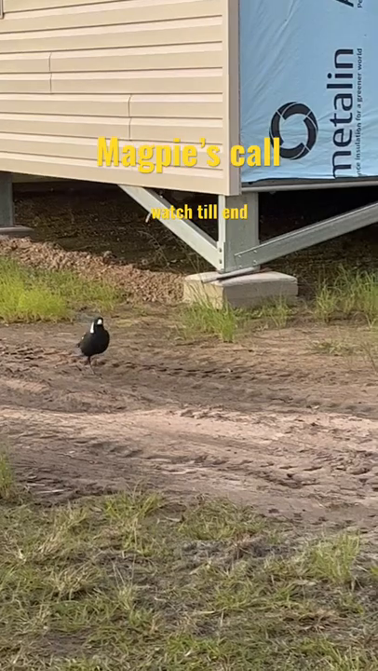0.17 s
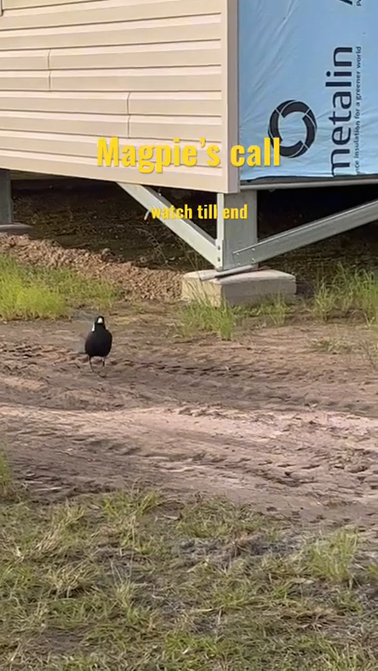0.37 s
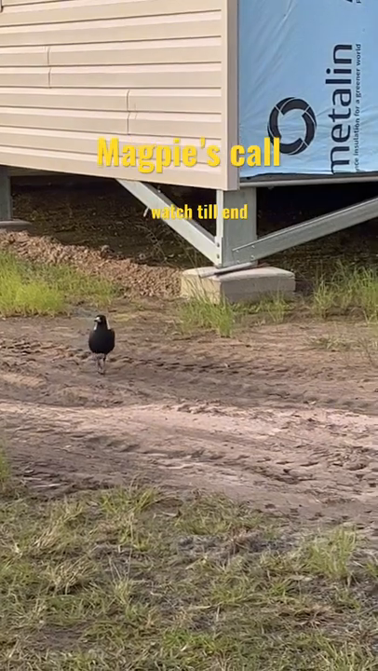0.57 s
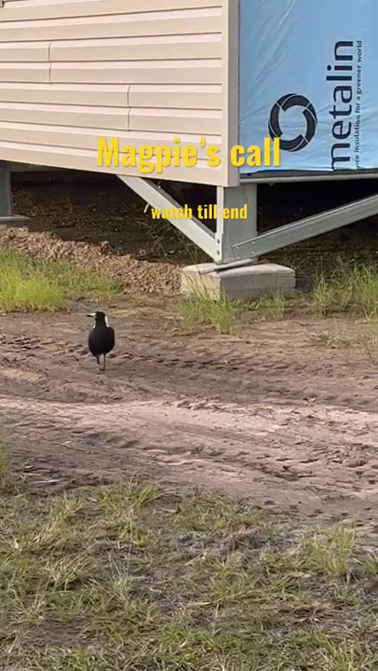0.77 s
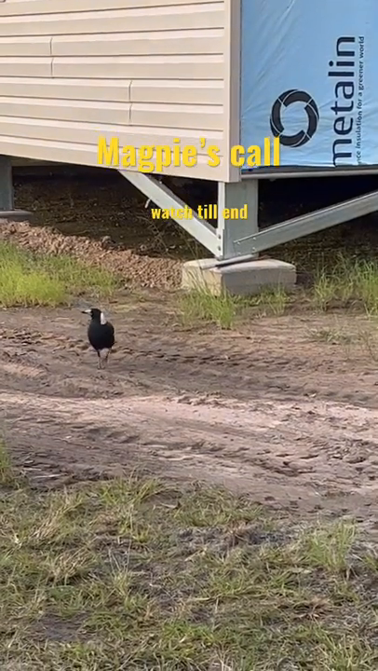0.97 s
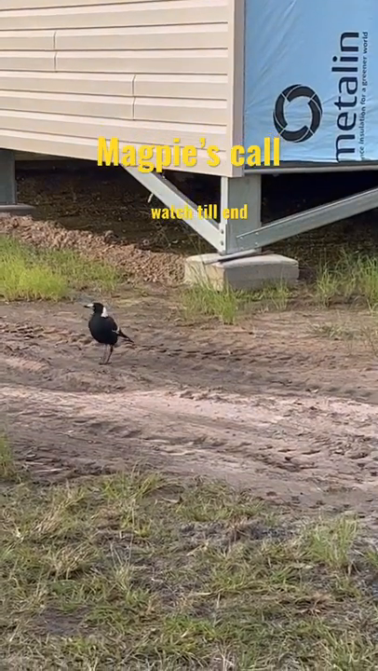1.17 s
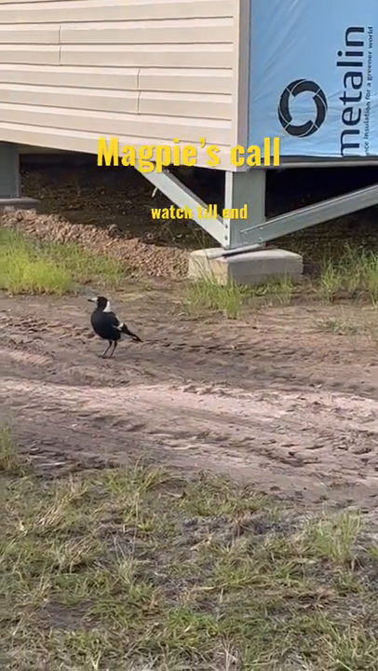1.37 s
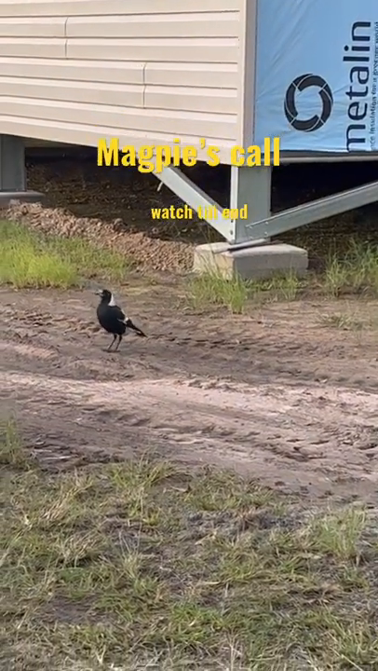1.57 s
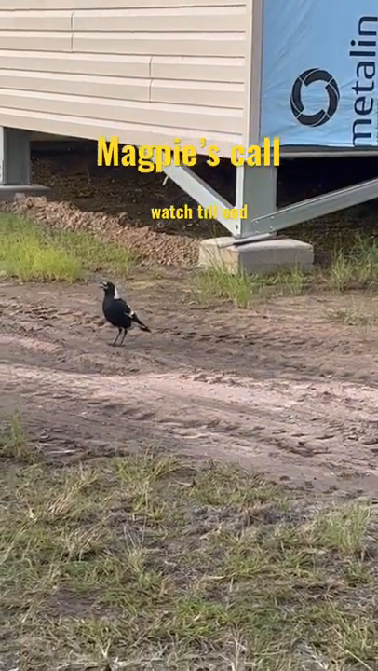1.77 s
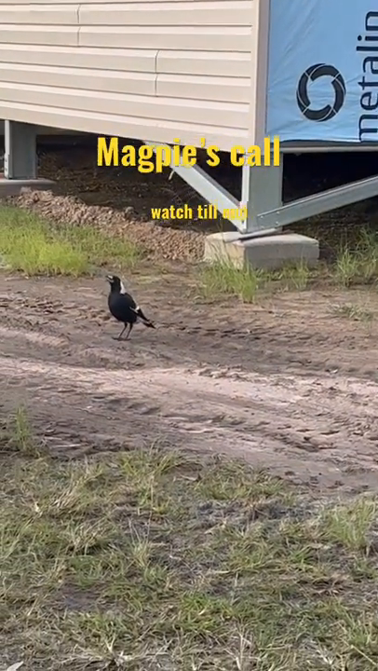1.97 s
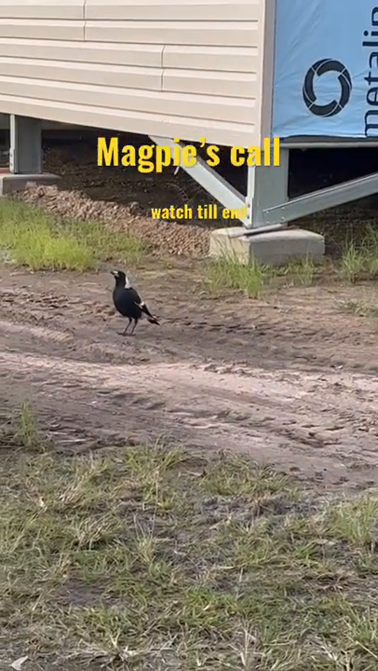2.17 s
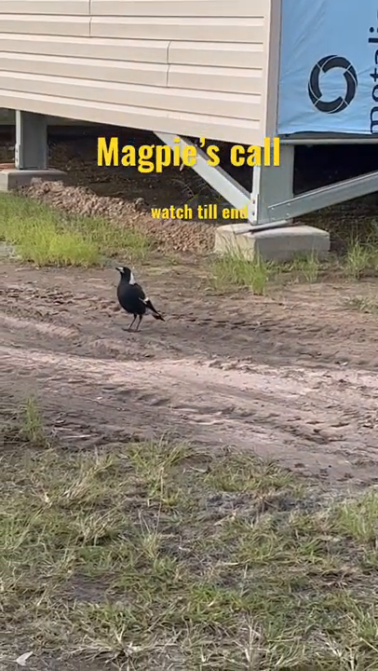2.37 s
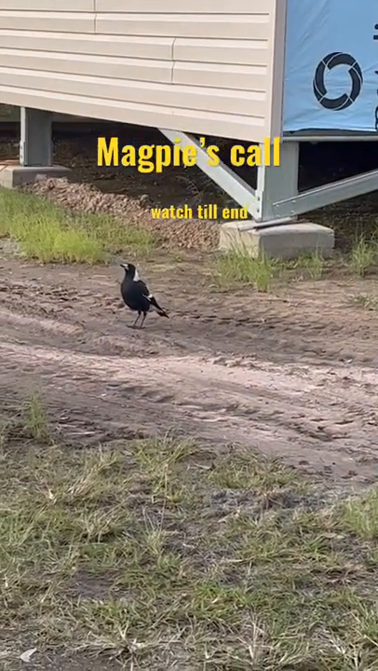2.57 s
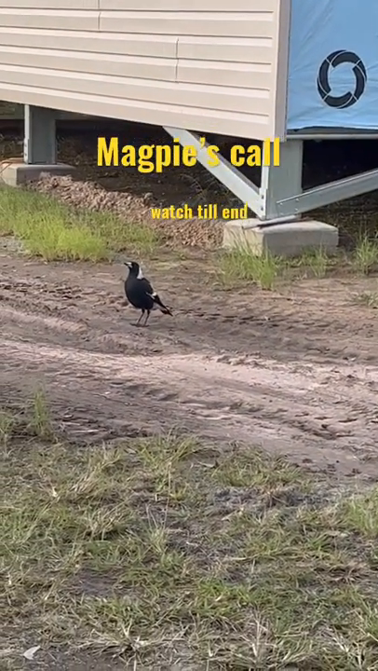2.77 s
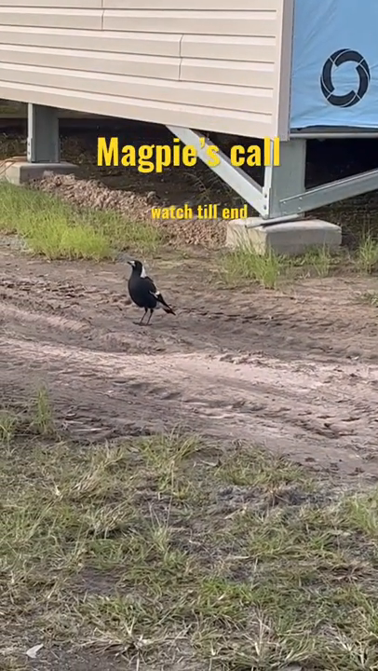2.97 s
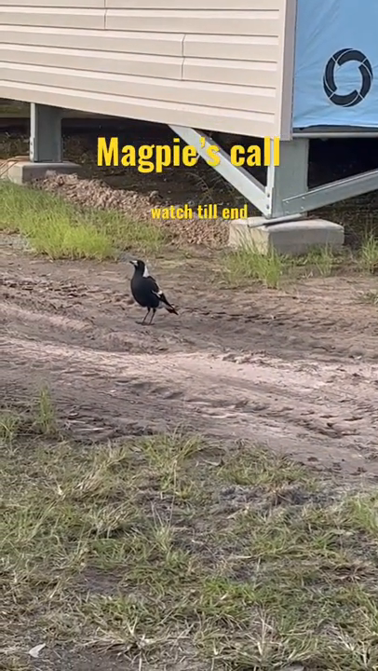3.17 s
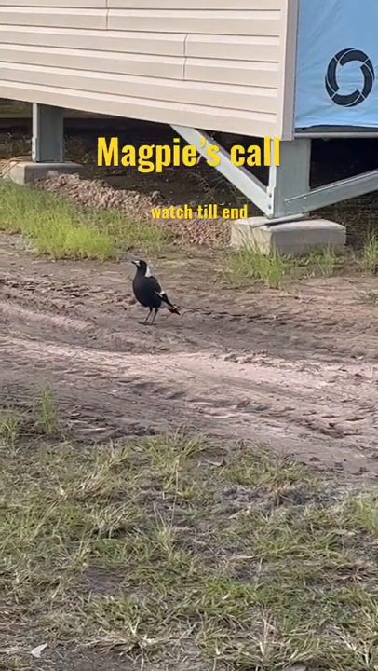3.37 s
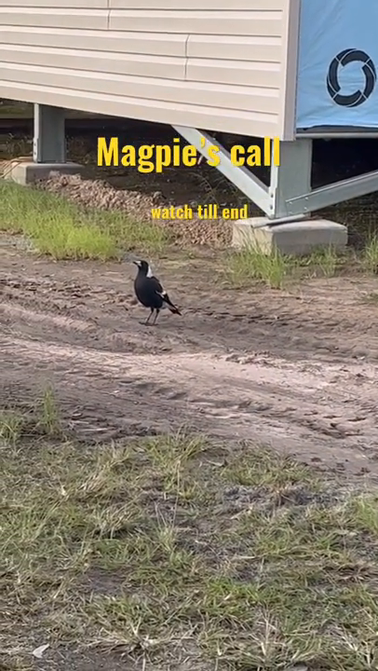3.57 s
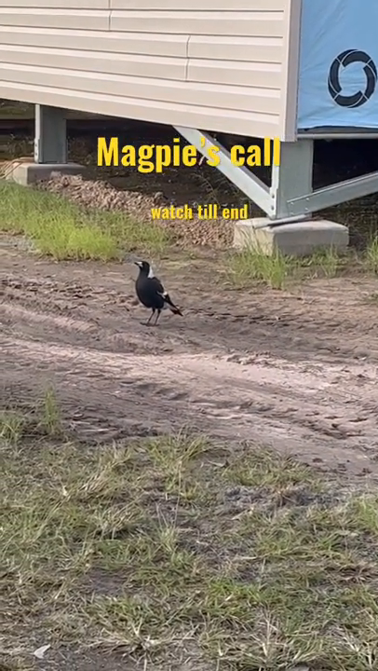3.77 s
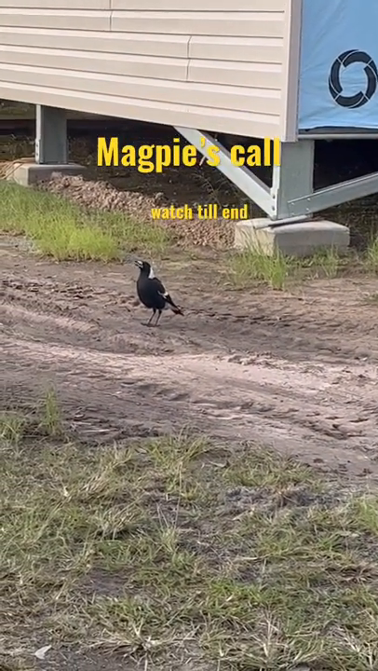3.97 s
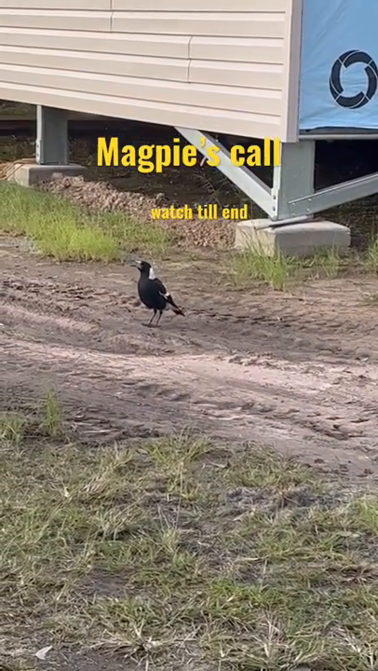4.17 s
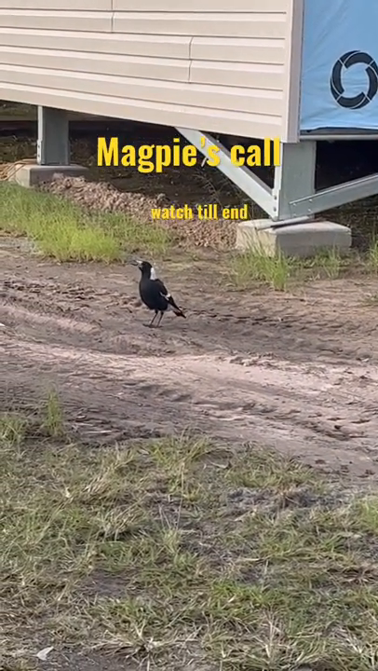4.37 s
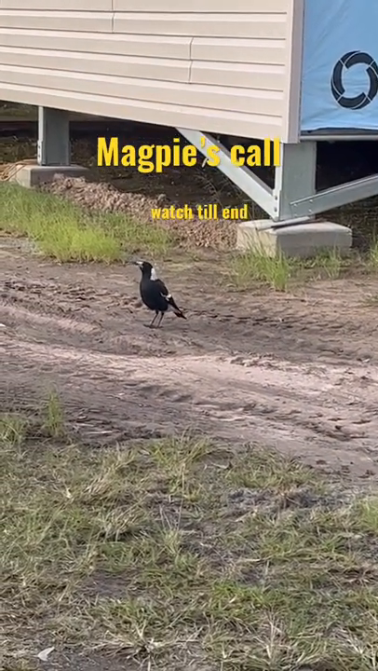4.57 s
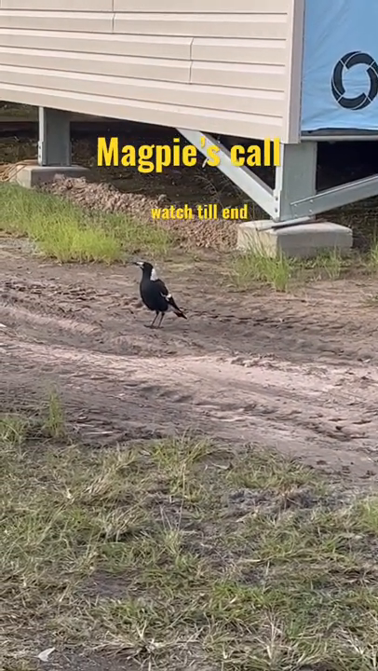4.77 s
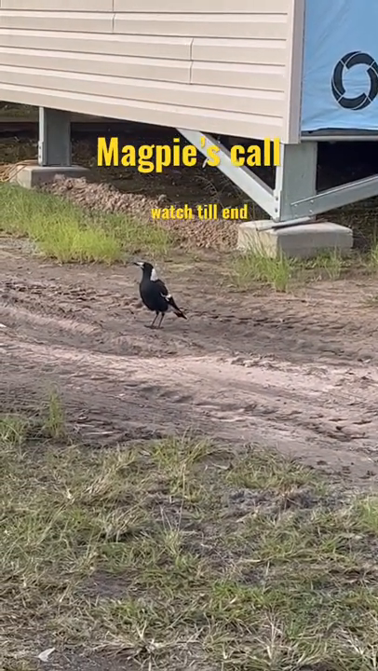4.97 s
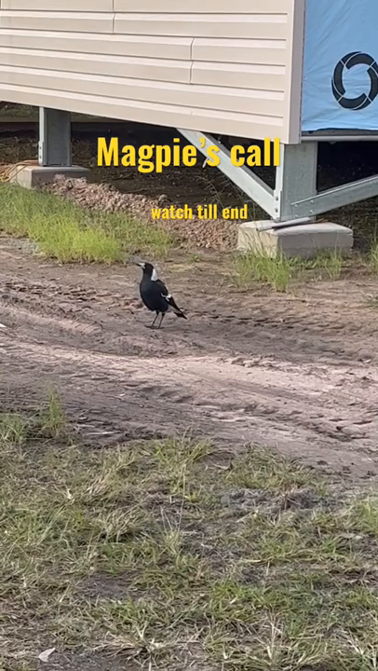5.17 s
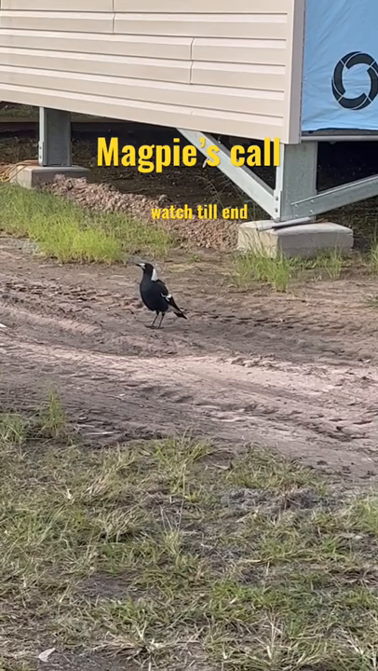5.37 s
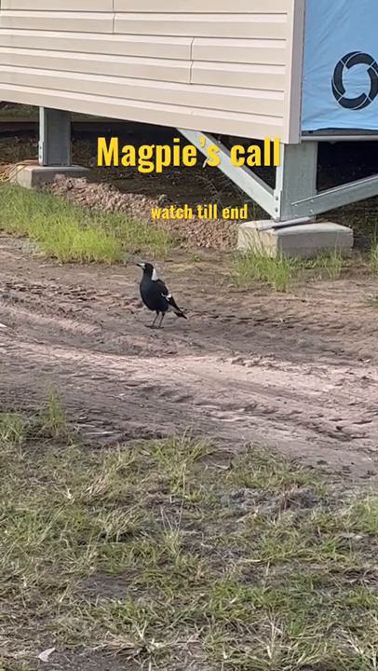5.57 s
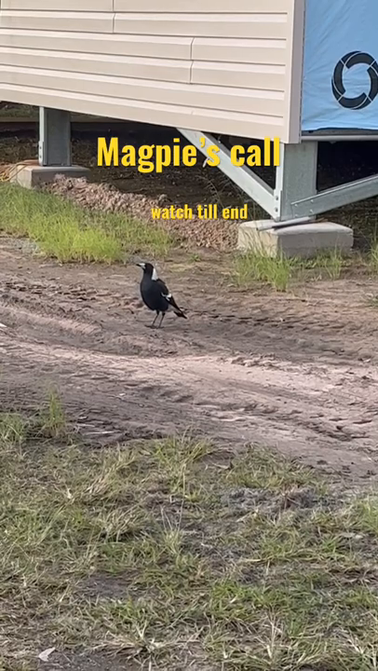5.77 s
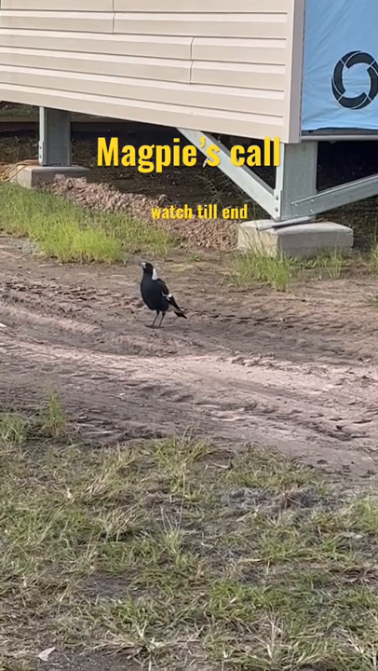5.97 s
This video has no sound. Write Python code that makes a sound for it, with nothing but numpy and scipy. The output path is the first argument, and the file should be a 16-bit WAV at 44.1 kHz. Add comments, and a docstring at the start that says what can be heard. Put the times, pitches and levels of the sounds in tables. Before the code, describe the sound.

Outdoors, a nearby magpie calls twice, each a harsh rasp snapping to a clear whistle and a rattling buzz, above swelling distant traffic.

```python
"""Magpie calling in a yard

A magpie on bare ground beside a cabin gives two falling calls, a few metres away. Each starts as a rasp, snaps
into a clear whistle and breaks into a buzz: sine partials of a moving pitch, roughened by the two sides of the
syrinx, with coloured noise for torn air. Delays and noise tails echo the calls and the faint ticks of grit close by.
Wavering sines make a far engine and drone, filtered noise the traffic and hiss, thin sliding sines a far bird."""
import sys
import numpy as np
from scipy import signal
from scipy.fft import rfft, irfft, next_fast_len
from scipy.io import wavfile
from scipy.ndimage import map_coordinates

SR = 44100
rng = np.random.default_rng(int(sys.argv[2]) if len(sys.argv) > 2 else 0)


def wav_out(sig):
    """Save sig, one row per channel (or a flat mono array), as 16-bit PCM at SR to the path in sys.argv[1]."""
    wavfile.write(sys.argv[1], SR, np.round(np.clip(np.atleast_2d(sig).T, -1, 1) * 32767).astype(np.int16))


N = 266011
T = np.arange(N) / SR
SIZE = next_fast_len(N + SR // 10, True)  # padded, so filters do not wrap round
FREQS = np.fft.rfftfreq(SIZE, 1 / SR)

# Traffic that draws nearer, then holds; the layers add their own trims. Each row: time in seconds,
# then the levels of deepest rumble, exhaust rumble, tyre roar and high hiss, all in dB.
TRAFFIC_LEVELS = [(0, -50.5, -50, -59, -108), (1.5, -50, -42.5, -54.5, -71.5), (2.3, -48, -40.5, -51, -68),
                  (3, -44.5, -38, -48.5, -63), (4.1, -40, -36.5, -51, -65.5),
                  (6.03, -42, -40.5, -52, -66.5)]


def magpie(call):
    """One call: the two sides of the syrinx grind, lock into a whistle, then lose and regain lock in a rattle."""
    # Overtones; the windpipe favours the odd ones. Each row: multiple of the pitch, level in dB.
    odd_series = [(3, 0), (5, -9.5), (7, -24), (9, -42)]
    even_series = [(2, 0), (4, -17)]
    # Weak top overtones that swell with the odd ones. Each row: multiple of the pitch, level in dB.
    edge_series = [(4, -32), (6, -26), (8, -26)]
    # Air rushing through the resonances of windpipe and beak. Each row: frequency in Hz, gain in dB.
    rasp_air = [(1200, -15), (2000, 4.5), (2800, -13), (3700, 4), (4600, 5), (5500, 13), (6200, 1),
                (6900, -23.5), (7600, -1.5), (8700, 7), (9800, -2.5), (10600, -15.5), (12000, -7),
                (14000, -4.5), (15000, -35)]
    # Windpipe and beak darken the valleys between resonances. Each row: frequency in Hz, gain in dB.
    beak = [(2200, 0), (2700, -5), (3300, 0.5), (6300, -2.5), (7200, -12), (7800, 1)]
    grind_hz, rattle_rise_hz_per_s = 431.6, 70  # pitch difference of the two sides in the rasp, in Hz; rise of their beat in the buzz, in Hz per second
    grind_depth, gap_depth = .51, .7
    grind_swing, rasp_jitter, buzz_jitter = .42, .55, .25  # phase, radians
    waver_db, overtone_waver_db, waver_hz = 1.8, 1.1, 40
    upper_db, lower_db, above_db = -8, -9, -12  # second side in the rasp, beat lines below and above in the buzz
    fundamental_sag_hz, octave_lag_hz = 44.5, 69.5  # below and above the falling buzz, 0.3 s into it
    air_db = -1

    start, clears, breaks, ends = call[:4]
    rattle_hz = call[-1]
    hz, levels = gesture(*call[:-1])
    sounding = step(start + .018, .014) * (1 - step(ends, .0093))  # dies away rather than stops
    base, even, odd = undb(levels) * sounding
    hoarse = 1 - step(clears, .008)
    buzz = step(breaks, .0014)
    fading = np.clip(T - breaks, 0, .3)
    spent = fading / (ends - breaks)

    grind = turn(grind_hz * (1 + .16 * walk(150)))
    beat_hz = rattle_hz + rattle_rise_hz_per_s * fading
    beat = turn(buzz * beat_hz * (1 + .03 * walk(70)))
    # the rattle follows the beat of the two sides, but stumbles more and more as the pressure falls
    rattle = beat + (.25 + 1.3 * spent) * walk(110)
    gap = buzz * (.5 + .5 * np.tanh(2.5 * (-np.cos(rattle) - .25 + .35 * walk(120))))
    loose = np.maximum(hoarse, gap)

    unrest = grind_swing * loose * np.sin(grind)
    unrest += (rasp_jitter * hoarse + buzz_jitter * gap) * walk(380)
    unrest += (.015 + .08 * buzz) * walk(90)
    # every pulse of the rattle pulls the pitch along and lets it slip back
    unrest += .75 * buzz * (1 - .5 * spent) * (np.sin(rattle) - .4 * np.sin(2 * rattle))
    throb = (1 - gap_depth * gap) * (1 + grind_depth * loose * np.cos(grind))

    phase = turn(hz)
    drift = (fading / .3) ** 2
    low = phase - turn(fundamental_sag_hz * drift)
    # the second side sings above the first in the rasp; in the buzz their beat puts a line on either side
    flanks = undb(lower_db) * np.sin(low - beat) + undb(above_db) * np.sin(low + beat)
    flanks *= undb(29 * fading)
    twin = hoarse * undb(upper_db) * np.sin(phase + grind + 2 * unrest) + buzz * flanks
    first_side = np.sin(low + fade(.1, 1, hoarse) * unrest)
    fundamentals = base * undb(waver_db * walk(waver_hz)) * (first_side + twin)

    bright = odd * undb(overtone_waver_db * walk(waver_hz)) * throb
    bright *= overtones(phase + .6 * unrest, odd_series + edge_series)
    # the octave grinds in the rasp but stays a clear line through the buzz, where it falls a little less
    octave_phase = phase + fade(.15, .65, hoarse) * unrest + turn(octave_lag_hz * drift)
    octave = even * fade(1, throb, hoarse) * overtones(octave_phase, even_series)

    # air leaks in uneven spurts while the membranes are unsettled
    spurts = unit(undb(3.5 * walk(350)))
    leak = odd * undb(air_db) * hoarse * throb * noise(rasp_air)
    leak += sounding * buzz * torn_air(spent, gap, grind)
    return colour(np.sqrt(2) * (fundamentals + bright + octave) + spurts * leak, beak)


def gesture(start, clears, breaks, ends, whistle_hz, rasp_db, voice_db):
    """Pitch and partial levels of a call: a swelling rasp, a gliding whistle, a dying buzz."""
    # Base strength of each voice, before the call's own level and the swells.
    # Columns: fundamental, even overtones and odd overtones, all in dB.
    rasp_strength = (-46, -42.5, -44.5)
    whistle_strength = (-28.5, -38.5, -30)
    buzz_strength = (-33, -48.5, -29)
    # Loss of each part by the end of the buzz. Columns: fundamental, even and odd overtones, in dB.
    buzz_loss = (16.5, 10, 28)
    rasp_hz, rasp_sag_hz_per_s = 1935, 1800
    overshoot_hz, settle_s, glide_s = 133.6, .013, 1.515  # the times are time constants
    whistle_swell_db, overtone_swell_db, swell_s = 11, 5.5, .11
    octave_fade_db_per_s, octave_lead_s = 129, .022  # the octave fades, then returns just before the buzz
    buzz_hz, buzz_fall_hz, buzz_fade_power = 1691, 324.5, 1.19
    lock_s, bend_s = .007, .0052  # rasp slides into whistle; pitch bends as the second side joins

    rasping = np.clip(T - start, 0, clears - start)
    whistling = np.clip(T - clears, 0, breaks - clears)
    spent = np.clip((T - breaks) / (ends - breaks), 0, 1)
    locked = step(clears - .004, lock_s)
    buzzing = step(breaks - .003, .002)

    glide = whistle_hz * np.exp(-whistling / glide_s) + overshoot_hz * np.exp(-whistling / settle_s)
    hz = fade(rasp_hz - rasp_sag_hz_per_s * rasping, glide, locked)
    hz = fade(hz, buzz_hz - buzz_fall_hz * spent, step(breaks - .004, bend_s))

    rasp_swell = fade(.1, .93, rasping / (clears - start))
    rasp = np.c_[list(rasp_strength)] + rasp_db + 20 * np.log10(rasp_swell)
    young = np.exp(-whistling / swell_s)
    held_back = np.array([whistle_swell_db * young, octave_fade_db_per_s * whistling, overtone_swell_db * young])
    whistle = np.c_[list(whistle_strength)] - held_back
    # the level falls ever faster as the air runs out
    buzz = np.c_[list(buzz_strength)] - np.outer(buzz_loss, spent ** buzz_fade_power)
    handover = np.array([buzzing, step(breaks - octave_lead_s, .018), buzzing])
    return hz, fade(fade(rasp, whistle + voice_db, locked), buzz + voice_db, handover)


def torn_air(spent, gap, grind):
    """The coarse rush of the buzz: it bursts out in the gaps of the rattle and sinks as the beak closes."""
    # Air torn by the buzz, in the resonances of the open beak. Each row: frequency in Hz, gain in dB.
    open_beak = [(1200, -19), (2000, -13), (2700, -20.5), (3900, -18), (4500, -5.5), (5200, 5.5),
                 (5700, 0.5), (6300, -1), (6750, 1.5), (7150, -21.5), (7700, -5), (8400, 1.5), (10000, -5),
                 (10700, -22), (11500, -15), (13500, -10), (14300, -13), (15000, -32)]
    air_db, air_fade_db = -46, 15.5
    closing = .075  # share by which the resonances sink
    # reading the noise ever more slowly lowers its resonances
    rush = map_coordinates(noise(open_beak), [np.cumsum(1 - closing * spent)], order=3, mode="mirror")
    bursts = (.6 + .75 * gap) * (1 + .6 * np.cos(grind))
    return rush * bursts * undb(air_db - air_fade_db * spent ** 2)


def grit():
    """Noise ticks, each a short crack with a faint trickle after it; soft scuffs swell and fade."""
    # Ticks of grit, before the trim tick_db. Each row: start in seconds, level in dB.
    ticks = [(0.38, -40.5), (0.577, -35.5), (2.676, -48.5), (3.4129, -56), (3.429, -46.5), (3.4663, -44.5),
             (4.641, -54.5)]
    # Soft scuffs on the ground. Each row: middle in seconds, half length in seconds, level in dB.
    scuffs = [(0.258, 0.0028, -74), (1.04, 0.023, -82), (5.18, 0.0058, -69), (5.497, 0.048, -67.5),
              (5.926, 0.009, -70), (6.006, 0.053, -71)]
    # Colour of grit. Each row: frequency in Hz, gain in dB.
    grit_spectrum = [(1000, 6), (3000, 9), (4800, 0.5), (6000, 0.5), (8000, 1), (10500, -3), (13000, -3.5),
                     (16000, 2)]
    crack_s, tail_s = .0015, .022  # decay time constants
    tail_db, tick_db = -20, -8
    envelope = sum(undb(db) * np.exp(-((T - at) / length) ** 2) for at, length, db in scuffs)
    for at, db in ticks:
        age = np.maximum(T - at, 0)
        decay = np.exp(-age / crack_s) + undb(tail_db) * np.exp(-age / tail_s)
        envelope += (T > at) * undb(db + tick_db) * decay
    return envelope * noise(grit_spectrum)


def yard(x):
    """Walls throw back echoes, ground a quick scatter, trees a thin tail; the beak beams treble away from them."""
    # Echoes of the cabin wall and of farther buildings.
    # Each row: delay on the left in seconds, delay on the right in seconds, level in dB.
    echoes = [(.029, .02896, -6.5), (.1, .10007, -12)]
    tail_db, tail_t60 = -7, .6  # trees; t60 in seconds
    close_db, close_t60 = -15, .13  # ground
    dull = colour(x, [(1000, 0), (1900, 0), (3500, -7), (5000, -8), (8500, -17), (14000, -22)])
    # clean reflections keep mostly the fundamental; the overtones scatter
    mirrored = colour(dull, [(2200, 0), (5000, -9)])
    walls = 0
    for *delays, db in echoes:
        walls = walls + undb(db) * np.array([np.interp(T - delay, T, mirrored) for delay in delays])
    tail = scatter(colour(dull, [(2000, -2), (3500, -1.5)]), tail_t60)
    close = scatter(colour(dull, [(2000, -6), (4500, 4), (8500, 3), (14000, 0)]), close_t60)
    return walls + undb(tail_db) * tail + undb(close_db) * close


def scatter(x, t60):
    """A diffuse tail of decaying noise, partly alike in both ears."""
    t = T[:SR]
    envelope = undb(-60 * t / t60) * (1 - np.exp(-t / .0061))
    shared, left, right = rng.standard_normal((3, SR)) * envelope
    responses = (shared + left, shared + right)
    return np.array([signal.fftconvolve(x, h / np.linalg.norm(h))[:N] for h in responses])


def traffic():
    """Low exhaust rumble, the roar of tyres and their hum, which swells as a vehicle goes by."""
    # Colours of deepest rumble, exhaust rumble, tyre roar and tyre hum.
    # Each row: frequency in Hz, gain in dB.
    deep_spectrum = [(20, -61), (33, -35), (45, 15), (58, 24.5), (72, 24.5), (100, -11), (200, -54)]
    rumble_spectrum = [(45, -18.5), (72, 1.5), (92, 3), (120, 2.5), (160, -1), (200, -4), (260, -5.5),
                       (320, -13), (420, -18.5), (700, -69)]
    roar_spectrum = [(200, -13), (400, -10.5), (600, -4), (900, 2.5), (1200, -2), (1600, -7), (2050, -10.5),
                     (2600, -21.5), (3500, -29.5), (5000, -44.5), (6200, -64), (14000, -71.5)]
    hum_spectrum = [(250, -57.5), (350, -6), (450, -8.5), (515, 0.5), (570, -5), (640, -8), (900, -23),
                    (1500, -90.5)]
    # Vehicles going by with humming tyres. Each row: nearest moment in seconds, level there in dB.
    passes = [(4.58, -43), (6.03, -54.5)]
    pass_s = .37  # from the nearest point to half the strength
    roar_db = 3
    deep, rumble, roar, _ = curves(TRAFFIC_LEVELS)
    swell = sum(undb(db) / (1 + ((T - at) / pass_s) ** 2) for at, db in passes)
    return (wide(deep_spectrum) * undb(deep)
            + wide(rumble_spectrum) * undb(rumble + .74 * walk(5.6))
            + wide(roar_spectrum) * undb(roar + roar_db + .94 * walk(26))
            + wide(hum_spectrum) * swell)


def engine():
    """Sine tones of a far engine and of a second drone, wavering on their way through the air."""
    # Engine tones, before the trims below. Each row: time in seconds,
    # firing line in dB, second harmonic in dB.
    engine_levels = [(0, -56.5, -50.5), (1, -45.5, -48), (2.7, -46.5, -44.5), (3.3, -32, -41),
                     (3.9, -40, -36.5), (4.5, -45.5, -47), (5.2, -41.5, -37.5), (6.03, -45, -48.5)]
    # A second drone in the traffic, before its trim. Each row: time in seconds, level in dB.
    drone_levels = [(0, -63.5), (2.4, -51), (2.8, -37.5), (3.6, -37.5), (4.1, -48), (6.03, -45.5)]
    firing_hz, firing_sag_hz_per_s, drone_hz = 90, 1, 147.9
    firing_db, second_db, drone_db = -1, -3, -2
    hz = firing_hz - firing_sag_hz_per_s * T
    first, second = curves(engine_levels)
    drone, = curves(drone_levels)
    lines = ((hz, first + firing_db), (2 * hz, second + second_db), (drone_hz, drone + drone_db))
    tones = 0
    for pitch, db in lines:
        tones = tones + undb(db + 2 * walk(11)) * np.sin(turn(pitch * (1 + .01223 * walk(6.57))))
    return np.sqrt(2) * tones


def hiss():
    """Smooth far noise that grows with the traffic."""
    # Colour of the hiss. Each row: frequency in Hz, gain in dB.
    hiss_spectrum = [(1500, -7.5), (2600, 6.5), (3600, -0.5), (5000, -5), (6200, -26), (9000, -32.5),
                     (14000, -41)]
    return wide(hiss_spectrum) * undb(curves(TRAFFIC_LEVELS)[-1])


def far_bird():
    """Thin sliding sine whistles, blurred by distance as a random wander of phase."""
    # Notes of a small bird far off. Each row: middle in seconds, half length in seconds,
    # pitch at the middle in Hz, slide in Hz per second, level in dB.
    notes = [(.765, .035, 3980, 3999, -79), (.855, .03, 4220, 4999, -79), (.895, .065, 3250, -4000, -76),
             (.755, .04, 2510, 4500, -76)]
    blur = 1.2  # radians
    song = 0
    for at, length, hz, slide, db in notes:
        swell = undb(db) * np.exp(-((T - at) / length) ** 2)
        song = song + swell * np.sin(turn(hz + slide * (T - at)) + blur * walk(150))
    return np.sqrt(2) * song


def wide(spectrum):
    """Noise from all around: its likeness in the two ears varies with frequency."""
    # Likeness of the traffic at the two ears. Each row: frequency in Hz, correlation from 0 to 1.
    likeness = [(60, 1), (150, 0.99), (290, 0.92), (550, 0.32), (1000, 1), (2200, 0.82), (5000, 1)]
    alike = np.clip(across(likeness), 0, 1)
    gain = undb(across(spectrum))
    mid = shaped(rng.standard_normal(N), gain * np.sqrt(1 + alike))
    side = shaped(rng.standard_normal(N), gain * np.sqrt(1 - alike))
    return unit(np.array([mid + side, mid - side]))


def undb(db):
    """Decibels to gain."""
    return 10 ** (np.asarray(db) / 20)


def unit(x):
    """Scale to rms 1."""
    return x / np.sqrt(np.mean(x ** 2))


def curves(table):
    """The columns of a timed table, one value a sample."""
    s, *columns = np.transpose(table)
    return [np.interp(T, s, c) for c in columns]


def across(points):
    """Join (Hz, value) points on a log-frequency axis."""
    hz, value = np.transpose(points)
    return np.interp(np.log(FREQS + 1), np.log(hz), value)


def shaped(x, gain):
    """Filter by one gain for each frequency."""
    return irfft(rfft(x, SIZE) * gain, SIZE)[..., :N]


def colour(x, spectrum):
    """Filter by a (Hz, dB) spectrum."""
    return shaped(x, undb(across(spectrum)))


def noise(spectrum):
    """Coloured noise of rms 1."""
    return unit(colour(rng.standard_normal(N), spectrum))


def walk(rate):
    """Smooth random wander of rms 1 that changes about rate times a second."""
    return unit(shaped(rng.standard_normal(N), 1 / (1 + (FREQS / rate) ** 4)))


def turn(hz):
    """Running phase of a moving frequency."""
    return 2 * np.pi * np.cumsum(hz) / SR


def overtones(phase, series):
    """Sum of (multiple, dB) partials of one running phase."""
    return sum(undb(db) * np.sin(round(k) * phase) for k, db in series)


def step(at, length):
    """A smooth switch from 0 to 1."""
    return .5 + .5 * np.tanh((T - at) / length)


def fade(a, b, share):
    """Pass from a to b as share goes from 0 to 1."""
    return a + (b - a) * share


def scene():
    """The magpie and the ticks of grit with their echoes, over the traffic and the small sounds of the yard."""
    # The calls. Each row: start in seconds, rasp clears in seconds, buzz starts in seconds,
    # end in seconds, whistle pitch before its overshoot and glide in Hz, trim of the rasp in dB,
    # trim of whistle and buzz in dB, rattle rate as the buzz starts in Hz.
    calls = [(1.537, 1.644, 1.914, 2.195, 1976, -3, -1.5, 140.6),
             (3.929, 4.041, 4.309, 4.549, 1961, 0.5, -0.4, 133)]
    near = sum(magpie(call) for call in calls) + grit()
    return near + yard(near) + traffic() + engine() + hiss() + far_bird()


def record(dry):
    """A phone's stereo widening: sound opens after a moment, phase shifts between channels, the top is cut."""
    # Phase by which the left channel leads. Each row: frequency in Hz, lead in radians.
    widening = [(0, 0), (300, -.1), (650, -1), (1650, -.8), (2000, .8), (2550, 2.4), (3600, 1), (4600, 1.4),
                (5050, 1.35), (5800, 3.1), (6800, 4.5), (7200, 6.2), (8100, 6.3), (10150, 9.4),
                (13000, 13.1), (16000, 18.2)]
    top_hz = 14600
    lead = np.interp(FREQS, *np.transpose(widening))
    running = step(.036, .001) * (1 - step(T[-1] - .003, .001))
    stereo = shaped(dry * running, np.exp(.5j * np.array([lead, -lead])))
    return signal.sosfilt(signal.ellip(8, .2, 70, top_hz, fs=SR, output="sos"), stereo)


dry = scene()
out = record(dry)
wav_out(out)
```